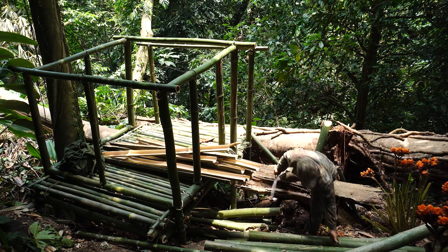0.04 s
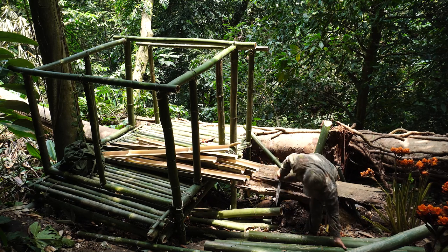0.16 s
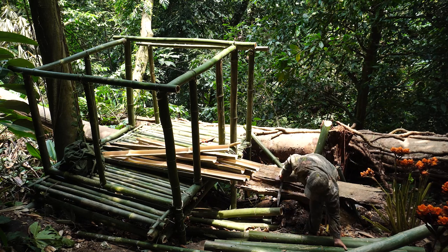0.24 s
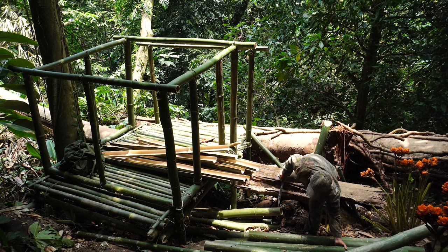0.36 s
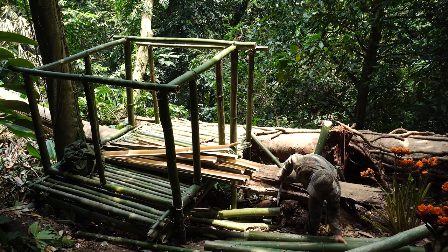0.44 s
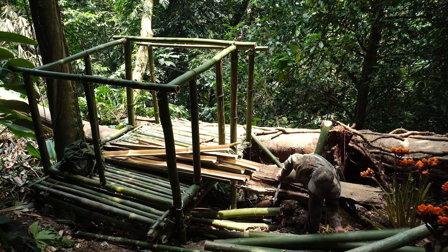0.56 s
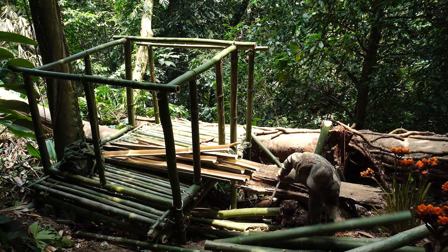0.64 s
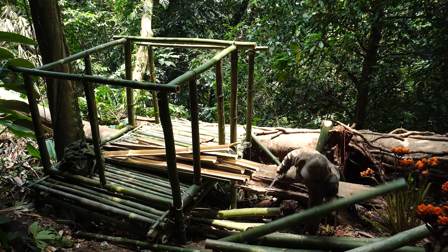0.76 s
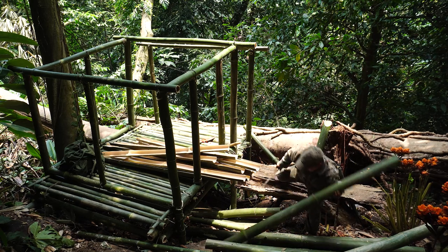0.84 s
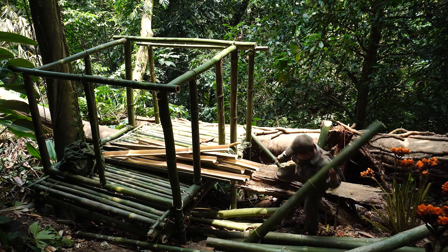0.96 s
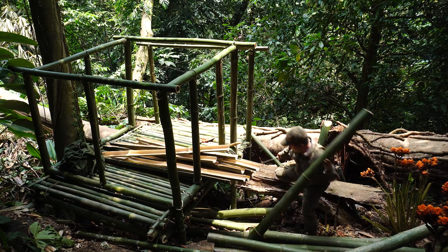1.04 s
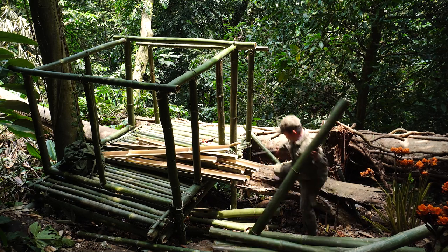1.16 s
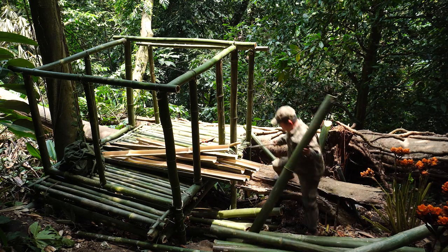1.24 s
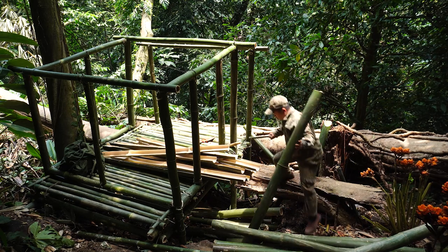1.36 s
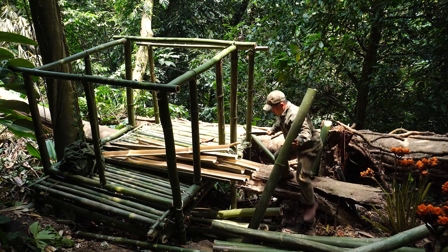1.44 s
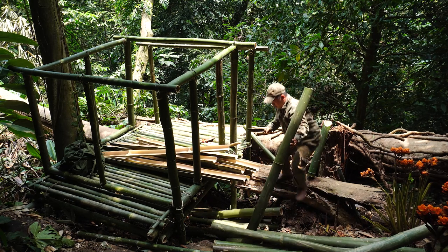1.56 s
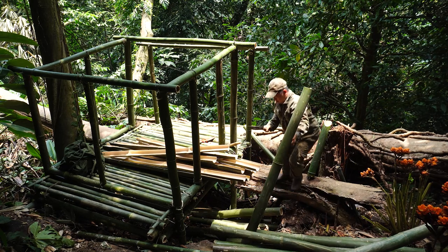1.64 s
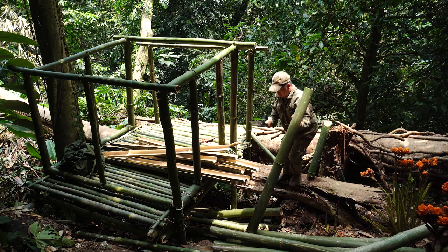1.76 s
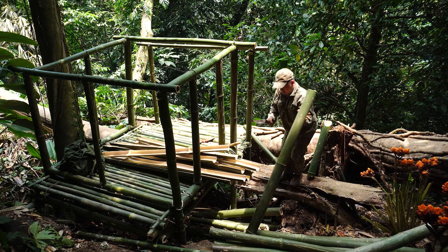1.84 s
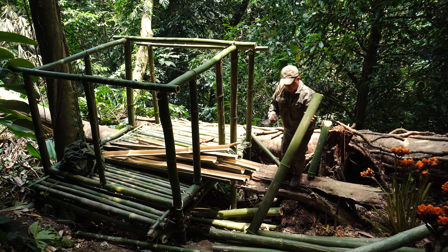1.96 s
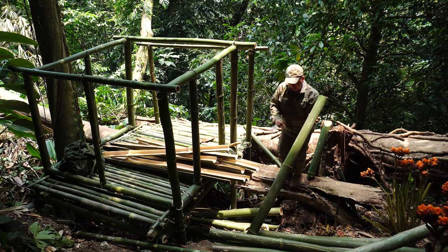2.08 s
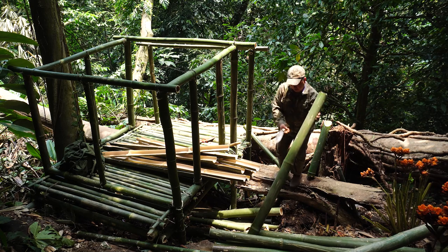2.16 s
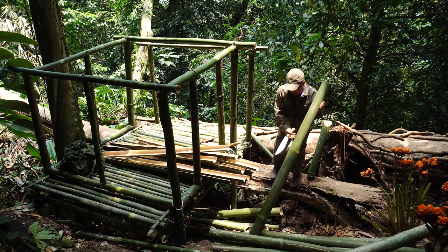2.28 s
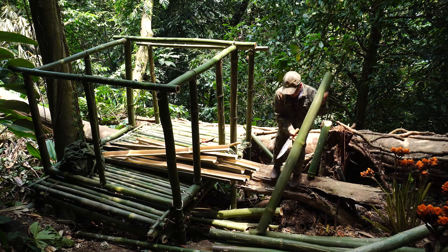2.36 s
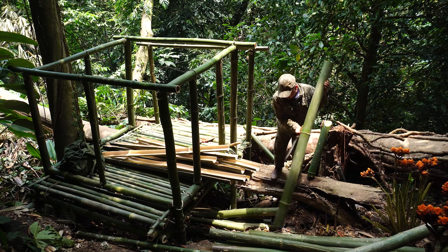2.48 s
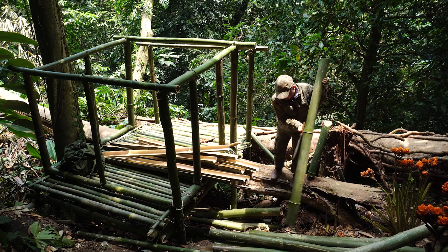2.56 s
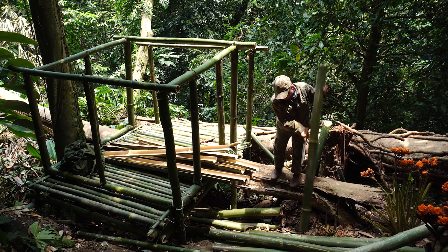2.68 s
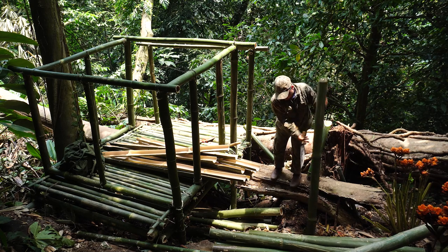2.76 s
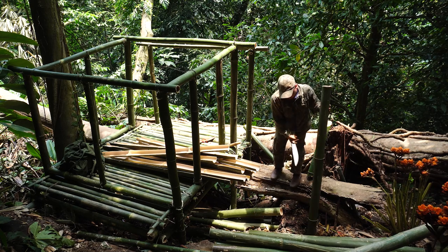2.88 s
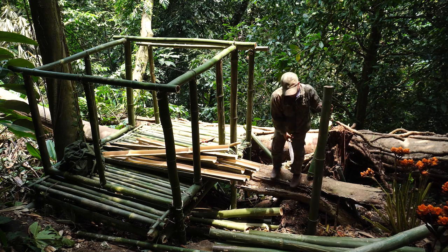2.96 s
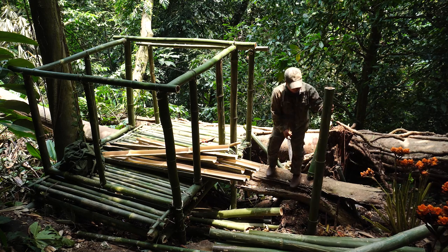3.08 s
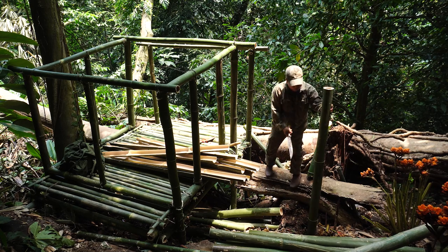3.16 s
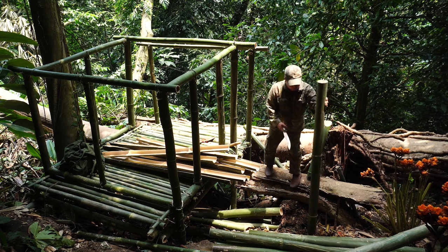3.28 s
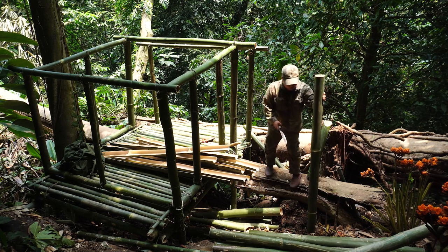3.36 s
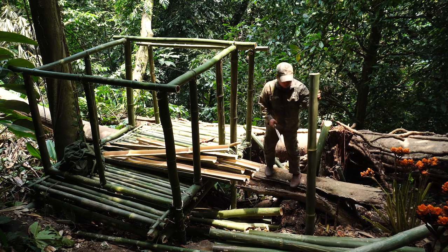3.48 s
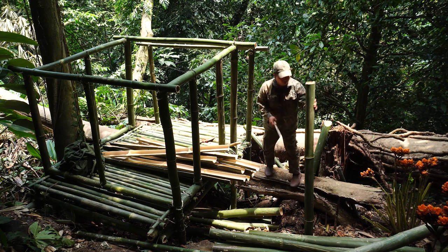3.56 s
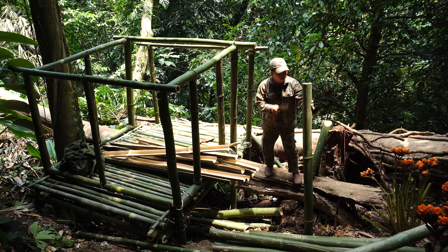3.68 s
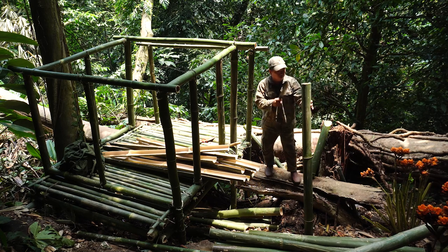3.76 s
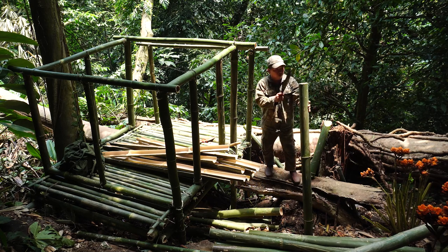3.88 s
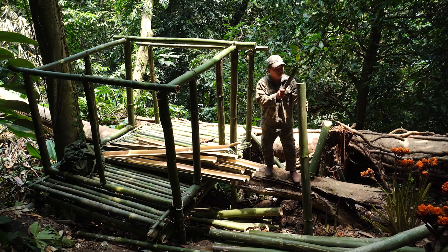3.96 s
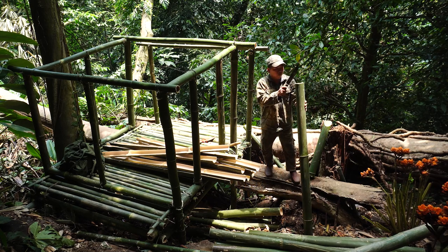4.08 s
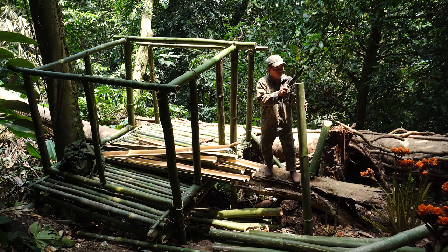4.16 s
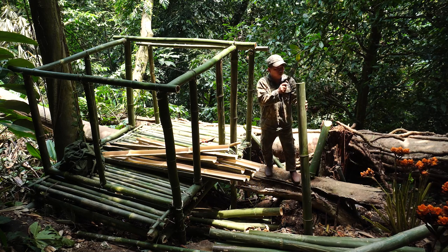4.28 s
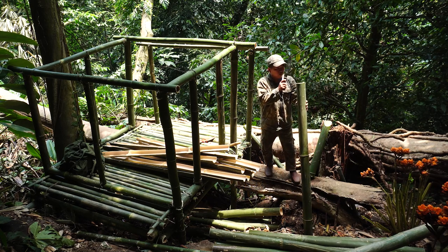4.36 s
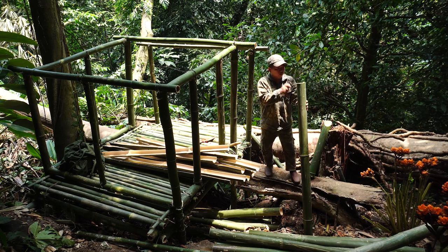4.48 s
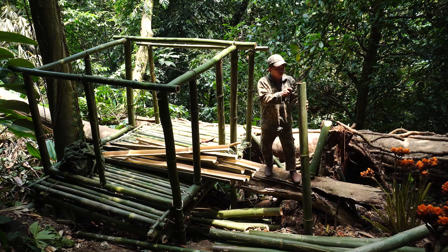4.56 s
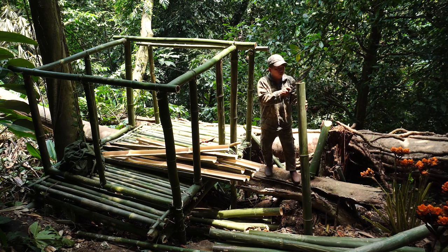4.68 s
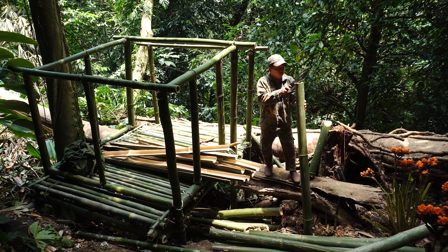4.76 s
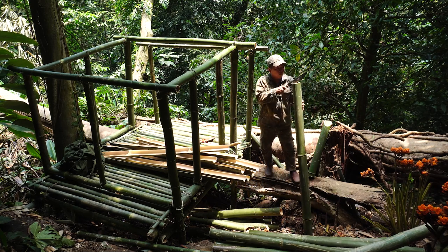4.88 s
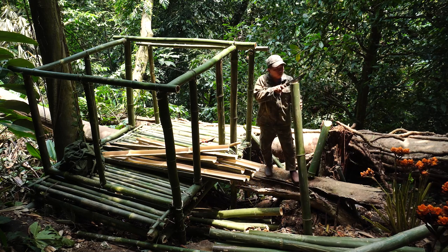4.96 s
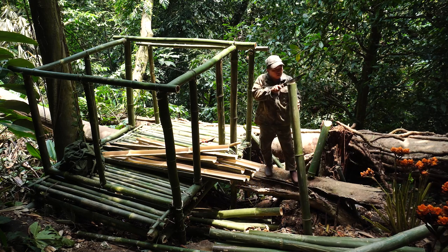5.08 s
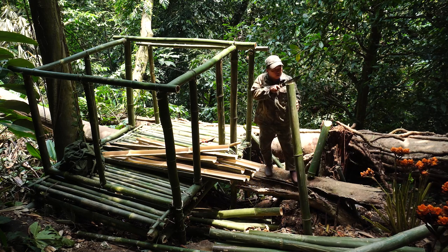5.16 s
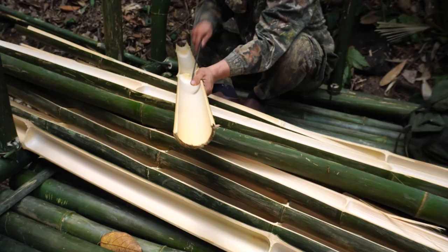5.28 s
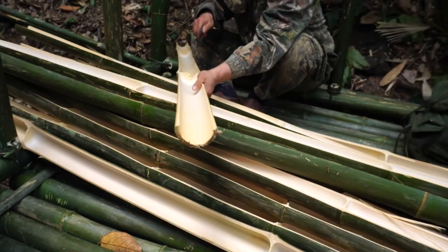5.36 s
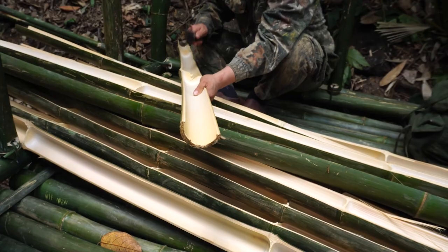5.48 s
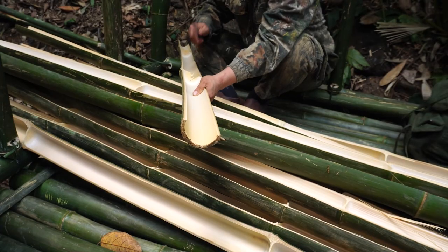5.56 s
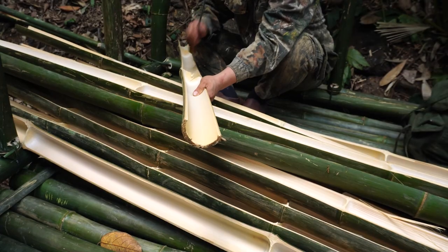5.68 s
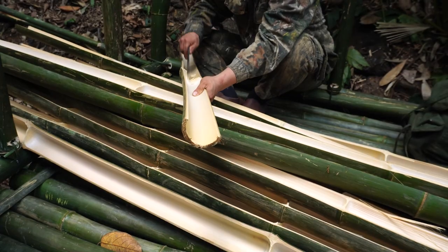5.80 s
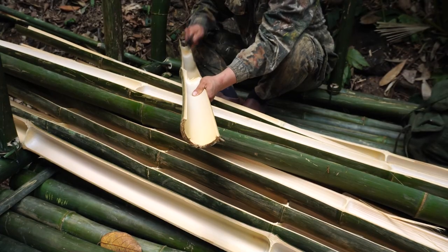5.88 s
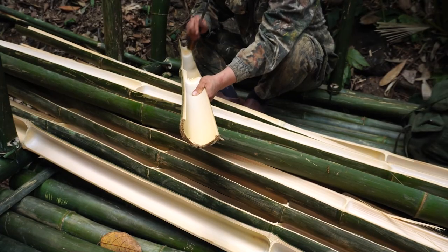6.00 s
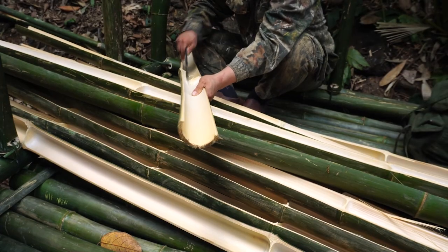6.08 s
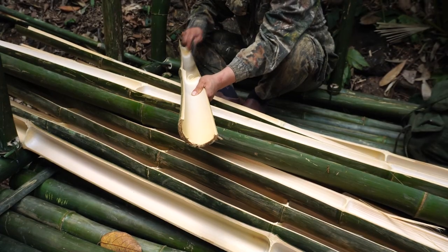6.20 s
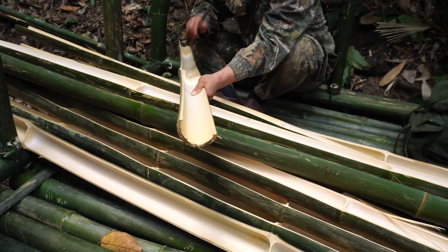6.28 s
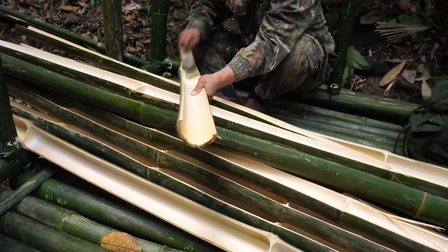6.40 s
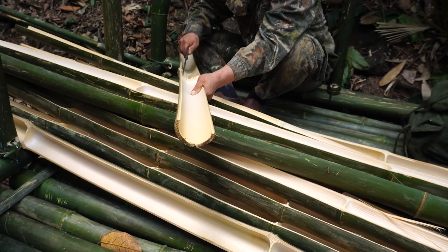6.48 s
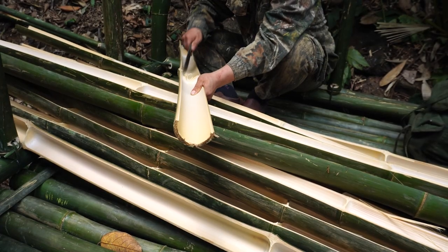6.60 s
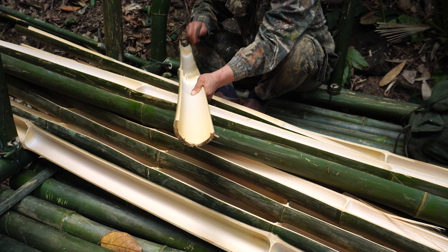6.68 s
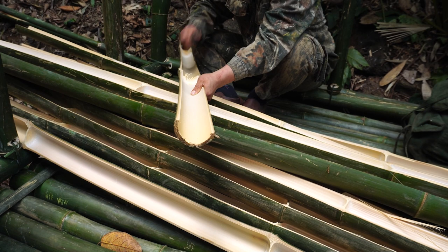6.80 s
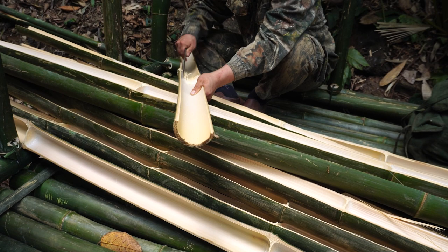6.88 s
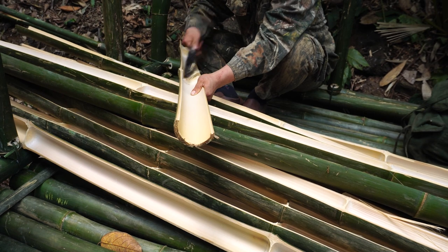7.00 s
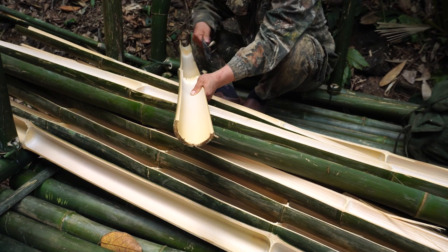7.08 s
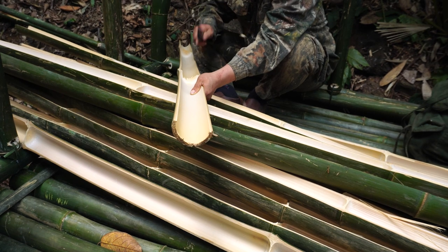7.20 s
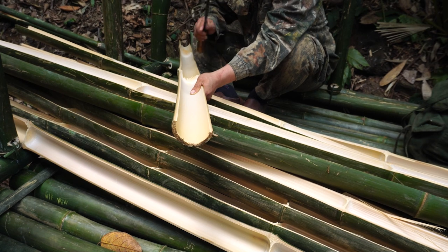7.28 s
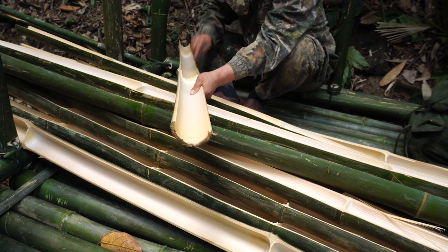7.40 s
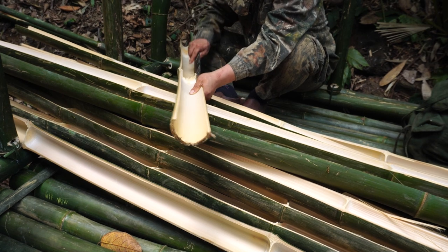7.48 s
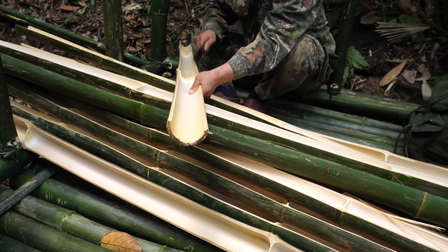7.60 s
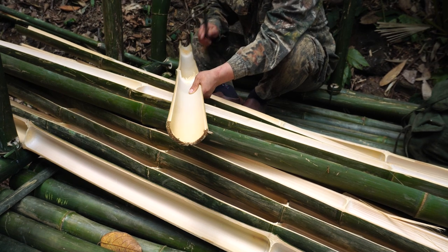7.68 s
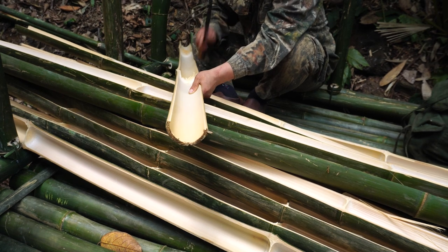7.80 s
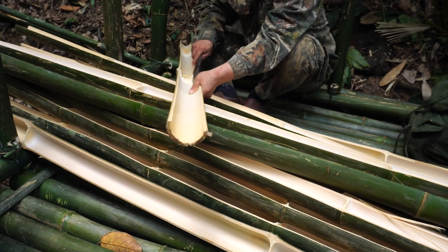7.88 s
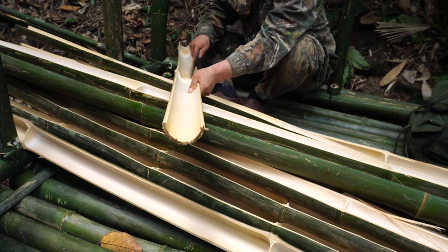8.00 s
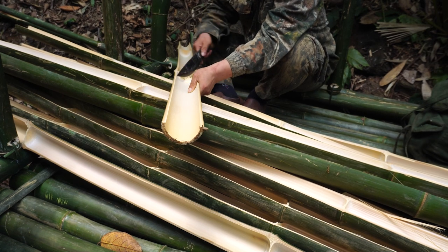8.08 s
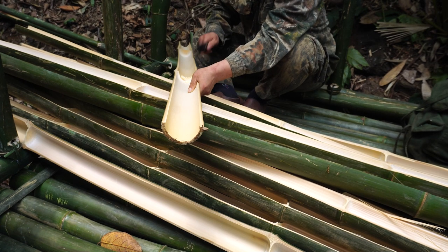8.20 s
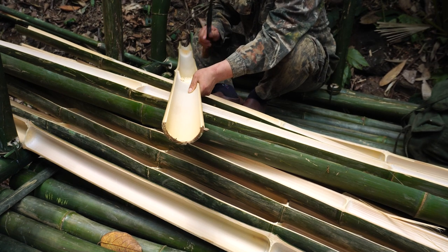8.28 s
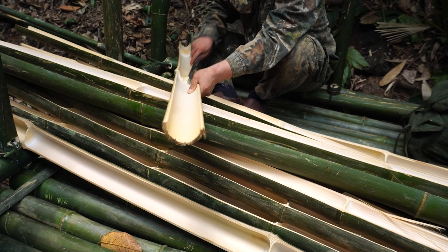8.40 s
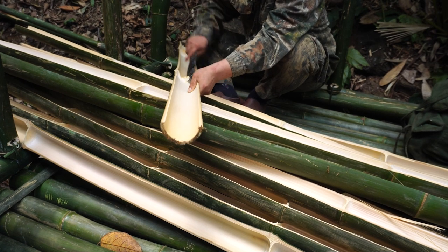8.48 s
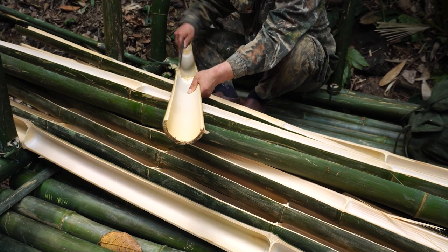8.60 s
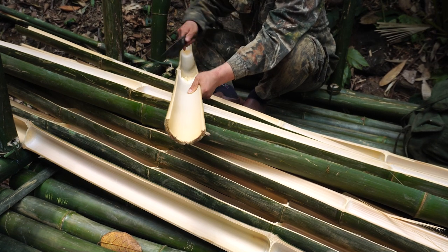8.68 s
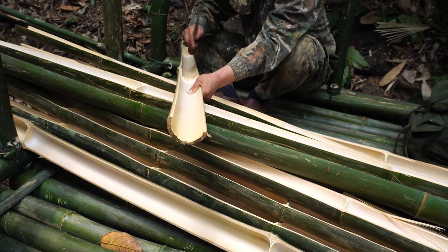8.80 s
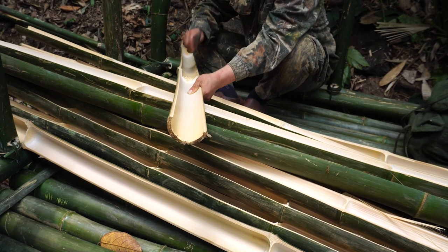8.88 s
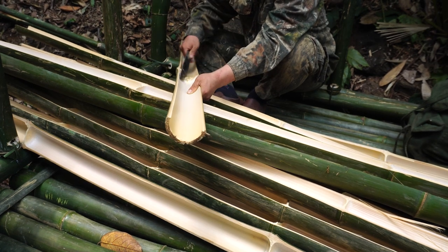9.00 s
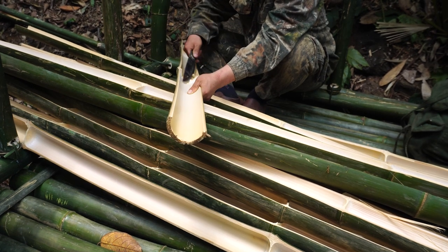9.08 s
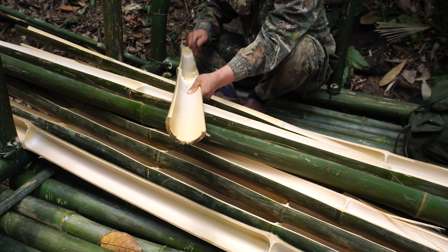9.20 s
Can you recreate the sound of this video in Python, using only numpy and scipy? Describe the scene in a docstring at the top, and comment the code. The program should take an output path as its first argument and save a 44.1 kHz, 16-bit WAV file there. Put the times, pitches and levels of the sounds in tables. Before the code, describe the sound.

Stereo outdoor sound, first from some metres off, then near the work. Bamboo rattles and tumbles early on with tree echoes, goes nearly quiet, and takes a hard knife hit and a weaker one. Then come close, drier chops on split bamboo, roughly two per second at first, slower and less regular later, with light rattling rebounds. High buzzing insect chirps, a thin whine before the cut, and soft leaf hiss surround it.

```python
"""In a forest, bamboo is worked. Some metres off, a long pole clatters on its neighbours and is struck with a knife;
then, close by, a split piece is set down, chopped with the knife and bounces on a pile of slats. Each blow sums
ringing modes, a noisy rattle and a crack of random snaps, with echoes from the trees; scrapes and grainy noise
are many tiny slips. Behind run rasping upward sweeps (chirps), a fluttering insect tone, one hoarse arched
bird call (a tone times noise) and the hush of air and leaves (banded noise)."""
import sys
import numpy as np
from scipy import signal
from scipy.fft import rfft
from scipy.io import wavfile

SR = 44100
rng = np.random.default_rng(int(sys.argv[2]) if len(sys.argv) > 2 else 0)


def store_wav(level_fs):
    """Save 16-bit WAV to argv[1]."""
    pcm = np.round(np.clip(np.atleast_2d(level_fs), -1, 1) * 32767)
    wavfile.write(sys.argv[1], SR, pcm.T.astype(np.int16))


N = 407925
TIME = np.arange(N) / SR
AGE = TIME[:SR // 3]   # time since a blow or the start of a chirp [s]
STOP_S = 5.34   # pole and whine stop abruptly here

# ringing modes of the split piece, before the hand damps them:
# (frequency [Hz], relative level [dB], t60 [s])
PIECE_MODES = [(133, -29.5, 0.28), (347, -27, 0.055), (472.7, -14.5, 0.41), (555.5, -7.5, 0.32),
               (588.1, -3, 0.138), (725.3, -8.5, 0.047), (837.7, -8, 0.0857), (827, -33.5, 0.18),
               (920.1, -12.5, 0.155), (1086.1, -9.5, 0.224), (1211.3, -12, 0.115), (1417.3, -5, 0.074),
               (1543, -10, 0.091), (1753, -11.5, 0.038), (2111.4, 1.5, 0.0385), (2184.7, 4.5, 0.0488),
               (2733.6, -5.5, 0.059), (3181, 2, 0.0289), (3786, -6.5, 0.067), (4300, -27.5, 0.027),
               (5150, -42.5, 0.037), (6270, -31.5, 0.134)]


def from_db(db):
    """Decibels to gain."""
    return 10 ** (np.asarray(db) / 20)


def rms(x):
    """Root mean square."""
    return np.sqrt(np.mean(x ** 2) + 1e-20)


def in_time(rows):
    """Each column of a curve, interpolated at every sample."""
    s, *columns = np.transpose(rows)
    return [np.interp(TIME, s, c) for c in columns]


def add(out, s, sound):
    """Mix a stereo sound in at time s."""
    at = max(round(s * SR), 0)
    out[:, at:at + sound.shape[1]] += sound[:, :N - at]


def butter(x, hz, kind, order=2):
    """Causal Butterworth filter."""
    sos = signal.butter(order, np.minimum(hz, .45 * SR), kind, fs=SR, output="sos")
    return signal.sosfilt(sos, x)


def drift(rate):
    """A random wander about zero through `rate` normal draws a second."""
    knots = rng.standard_normal(4000)
    return np.interp(TIME * rate, np.arange(len(knots)), knots)


def widen(pair, side_db):
    """Two unrelated signals as mid and side; returns left and right."""
    side = from_db(side_db) * pair[1] * np.array([[1], [-1]])
    return (pair[0] + side) / np.sqrt(1 + from_db(side_db) ** 2)


def banded_noise(table, size, side_db, count=1):
    """Stereo noises built of half-octave bands; with a t60 column, each band dies at its own rate."""
    hz, level, *t60 = np.transpose(table)
    edges = 25 * 2 ** np.arange(0, 9.6, .5)
    # neighbouring bands draw on different noise
    white = rng.standard_normal((2, 2, count, 1, size))
    out = np.zeros((count, 2, size))
    for k, (low, high) in enumerate(zip(edges, edges[1:])):
        centre = np.sqrt(low * high)
        if hz[0] / 1.2 < centre < hz[-1] * 1.2:
            fade_db = 0
            if t60:
                fade_db = -60 * TIME[:size] / np.interp(np.log(centre), np.log(hz), t60[0])
            gain = from_db(np.interp(np.log(centre), np.log(hz), level) + fade_db)
            # long waves reach both microphones alike
            band_side_db = side_db - 10 * np.log10(1 + (300 / centre) ** 2)
            out += butter(widen(white[k % 2], band_side_db) * gain, [low, high], "band")
    return out


def hush():
    """Soft forest air, noise strongest around 500 to 900 Hz, with the stirring hiss of leaves on top."""
    # slow swell: (time [s], relative level of air [dB], relative level of leaves [dB])
    swell = [(0, -57.5, -70), (2.4, -56, -69), (3.2, -57, -70.5), (5.7, -57.5, -69.5), (9.25, -56.5, -69.5)]
    # colour of the air: (frequency [Hz], relative density [dB per Hz])
    air_colour = [(30, -47.5), (60, -59), (110, -22), (170, -23.5), (260, -10), (480, -3), (900, -4),
                  (1800, -7.5), (3000, -7.5), (3800, -15)]
    # colour of the leaf hiss: (frequency [Hz], relative density [dB per Hz])
    leaf_colour = [(2000, -4.5), (3500, 8), (5500, 2), (8000, 1), (12000, -5.5), (16000, -5.5)]
    air_db, leaf_db = in_time(swell)
    air = banded_noise(air_colour, N, side_db=1.5)[0]
    leaves = banded_noise(leaf_colour, N, side_db=-2.0)[0]
    stir_db = .8 * drift(20)
    air_layer = from_db(air_db + 2.3051) * air / rms(air)
    return air_layer + from_db(leaf_db + 8.0 + stir_db) * leaves / rms(leaves)


def chirp_times():
    """Time and level of every chirp: lost time slows the start of a run, which settles to an even pace."""
    # (start [s], end [s], settled spacing [s], time lost getting up to speed [s], starting level [dB])
    runs = [(0.018, 1.1, 0.1912, 0.0, -46.5), (1.527, 3.8, 0.1747, 0.0899, -45.5),
            (3.927, 5.47, .176, .035, -45), (7.12, 9.2, 0.1755, 0.071, -47.5)]
    settle_chirps, swell_db_per_s = 2.1, 0.5
    for start, end, spacing, lost, db in runs:
        k = np.arange(20)
        times = start + spacing * k + lost * (1 - np.exp(-k / settle_chirps))
        levels = db + swell_db_per_s * (times - start) + 0.93 * rng.standard_normal(len(k))
        yield from zip(times[times < end], levels)


def from_afar(call, t60, direct_db):
    """A call from deep in the trees: decaying noise scatters it, with a little of the direct ray."""
    scatter = widen(rng.standard_normal((2, SR)), side_db=-1.5) * from_db(-60 * TIME[:SR] / t60)
    scatter /= rms(scatter) * np.sqrt(SR)   # unit energy
    return from_db(direct_db) * call + signal.fftconvolve(call, scatter, axes=1)[:, :N]


def chirps(start_hz=4100, end_hz=4720, length_s=.075, rasp_hz=120, second_db=-4):
    """Rasping upward sweeps, each followed by a weaker one, smeared by the trees into a buzzing band."""
    out = np.zeros((2, N))
    progress = np.minimum(AGE / length_s, 1)
    arch = (4 * progress * (1 - progress)) ** 0.473
    ear_db = np.array([[0.0], [1.8]])   # a little stronger on the right
    for s, db in chirp_times():
        for delay_s, stroke_db in [(0, 0), (rng.uniform(.05, .09), second_db)]:
            rasp = butter(rng.standard_normal(len(AGE)), 275.7, "low")
            hz = start_hz + (end_hz - start_hz) * progress + rasp_hz * rasp / rms(rasp)
            sweep = arch * np.sin(2 * np.pi * np.cumsum(hz) / SR)
            add(out, s + delay_s, from_db(db + stroke_db + ear_db) * sweep)
    return butter(from_afar(out, t60=1.0, direct_db=-5.5), [4020, 4760], "band", order=5)


def whine(waver_db=1.5, upper_hz=2780, upper_db=-68, fade_s=0.049):
    """A thin fluttering insect tone in short phrases, with a fainter one that comes and goes above it."""
    # slow rise of the tone: (time [s], frequency [Hz])
    pitch = [(0, 2400), (1.5, 2472), (2.5, 2503), (4, 2518), (5.3, 2545)]
    # phrases, before flutter and stereo balance: (start [s], end [s], level [dB])
    phrase_rows = [(0.1, 0.85, -67.5), (0.902, 1.846, -56), (1.933, 2.625, -56), (2.704, 3.122, -57.5),
                   (3.271, 3.445, -55), (3.514, 3.901, -57.5), (3.946, 4.282, -57), (4.299, 4.802, -55.5),
                   (4.85, 4.981, -56.5), (5.049, 5.313, -56.5)]
    hz, = in_time(pitch)
    phrases = np.zeros(N)
    for start, end, db in phrase_rows:
        phrases += from_db(db) * np.clip(np.minimum(TIME - start, end - TIME) / fade_s, 0, 1)
    flutter = 1 + .35 * drift(80)
    tone = np.sin(2 * np.pi * np.cumsum(hz + 9 * drift(70)) / SR)
    main = phrases * from_db(waver_db * drift(10)) * flutter * tone
    upper = from_db(upper_db + 3 * drift(4)) * drift(60) * np.sin(2 * np.pi * upper_hz * TIME)
    before_stop = np.clip((STOP_S - TIME) / .01, 0, 1)
    return (main + upper) * before_stop * from_db([[-1.5], [1.8]])


def forest(x, build_s):
    """Echoes from the trees: noise that builds up over about build_s and dies away band by band."""
    # scatter from trunks and leaves: (frequency [Hz], relative level [dB], t60 [s])
    scatter_bands = [(50, -17, 0.36), (90.8, 9, 0.446), (140.5, 8.5, 0.82), (275.5, 7, 0.385),
                     (576, -6, 0.299), (1530, -5, 0.472), (3010, -6, 0.455), (6040, -3.5, 0.456),
                     (15000, -1.5, 0.371)]
    echo = banded_noise(scatter_bands, SR, side_db=-5.0)[0] * (1 - np.exp(-(TIME[:SR] / build_s) ** 2))
    echo /= rms(np.abs(rfft(echo))[:, 400:2500])   # unit mean gain from 400 to 2500 Hz
    return signal.fftconvolve(x, echo, axes=1)[:, :N]


def blow(modes, rattle, bands_db, split_s, rattle_db, side_db):
    """One contact: fibres crack for some ms, modes ring, neighbours rattle; each register has its strength."""
    hz, level, t60 = np.transpose(modes)[:, :, None]
    # grip and point of contact shift and weight the modes anew at every blow
    hz = hz * rng.normal(1, .008, hz.shape)
    strength = from_db(level + rng.normal(0, 2.5, hz.shape) - 60 * AGE / t60)
    # each mode radiates its own pattern, so it meets the two microphones at different phases
    phase = rng.uniform(0, 2 * np.pi, hz.shape)
    skew = np.arctan(from_db(side_db) * hz / np.hypot(hz, 300)) * rng.choice([-1, 1], hz.shape)
    ring = np.array([(strength * np.sin(2 * np.pi * hz * AGE + phase + ear * skew)).sum(axis=0)
                     for ear in (1, -1)])
    ring *= 1 - np.exp(-AGE / 0.000765)

    # about 6000 fibre snaps a second, swelling and fading with the splitting time
    snaps = (rng.random((2, len(AGE))) < 6000 / SR) * rng.standard_normal((2, len(AGE)))
    crack = butter(widen(snaps, side_db=-6), [1500, 8500], "band", order=1)
    crack = crack * AGE / split_s * np.exp(-(AGE / split_s) ** 1.07)

    attack = AGE < .02   # levels are set over the first 20 ms
    parts = [(ring, 0), (rattle, rattle_db), (crack, -9)]
    sound = sum(from_db(db) * part / rms(part[:, attack]) for part, db in parts)
    sound = sound * (1 - from_db(-10) * np.exp(-AGE / 0.0132))   # the force builds as the contact deepens
    registers = [butter(sound, 700, "low", order=4),   # thud
                 butter(sound, [700, 1800], "band", order=3),   # body
                 butter(sound, [1800, 5000], "band", order=3),   # clack
                 butter(sound, 5000, "high", order=4)]   # crack
    return sum(from_db(db) * part / rms(part[:, attack]) for part, db in zip(registers, bands_db))


def blows(contacts, modes, clack_db, rattle_db, side_db, ring_t60, grip_db_per_s, echo_db, build_s):
    """Blows on one piece, damped by the hand; a hard contact is brighter, a clean ring leaves less rattle."""
    # dense rattle of bamboo on bamboo, before the hand damps it:
    # (frequency [Hz], relative density [dB per Hz], t60 [s])
    rattle_bands = [(40, -62.5, 0.035), (114.8, -18, 0.3), (203.6, -11, 0.14), (436.2, 7.5, 0.2015),
                    (921, -6.5, 0.291), (2465, 3.5, 0.0995), (4790, -5.5, 0.0416), (7850, -24, 0.14),
                    (15500, -41.5, 0.012)]
    clack_share = 0.43   # a harder contact lifts the clack by this share of what it adds to the crack
    direct = np.zeros((2, N))
    rattles = banded_noise(rattle_bands, len(AGE), side_db, count=len(contacts))
    for (s, db, thud, crack, ring_hz, ring_db, split_s), rattle in zip(contacts, rattles):
        bands_db = db + np.array([thud, 0, clack_db + clack_share * crack, crack])
        all_modes = modes + [(ring_hz, ring_db, ring_t60)]
        sound = blow(all_modes, rattle, bands_db, split_s, rattle_db - ring_db, side_db)
        add(direct, s, sound * from_db(-grip_db_per_s * AGE))
    return direct + from_db(echo_db) * forest(direct, build_s)


def pole(ring_db=6.0, knock_split_s=0.0107, cut_split_s=0.00377):
    """The long pole, some metres off, is handled and then struck; it falls silent abruptly at STOP_S."""
    # knocks on neighbours and ground; level is that of the body register, thud and crack relative to it:
    # (time [s], level [dB], thud [dB], crack [dB], main ring [Hz])
    knock_rows = [(0.456, -53, 7.5, -18, 499.4), (0.518, -46.5, 0.5, -31.5, 518),
                  (0.883, -43.5, -9.5, -5.5, 503.4), (1.066, -26.5, -8.5, -20, 461.2),
                  (1.082, -31, -2.5, -29.5, 622), (1.15, -31.5, -0.5, -25.5, 634),
                  (1.182, -35.5, -10.5, -23.5, 854), (1.301, -44.5, 3.5, -16, 474.7),
                  (1.363, -40, 5, -27, 486.8), (1.448, -34.5, -9.5, -29.5, 893.7),
                  (1.76, -60.5, -12.5, 7.5, 827), (1.908, -47.5, -8, -36.5, 770.7),
                  (2.432, -57, 1, -4.5, 477), (2.639, -61, 8.5, -19.5, 504), (2.891, -40.5, -13, -6, 816.8),
                  (3.661, -64.5, -5.5, 0.5, 837)]
    # the knife strikes the upright pole, same levels:
    # (time [s], level [dB], thud [dB], crack [dB], main ring [Hz], relative ring level [dB])
    cut_rows = [(4.601, -20.5, -27.5, -14, 1010, 1.5), (5.277, -35, -8, -19.5, 818, 11.5)]
    # ringing modes, before the hand damps them: (frequency [Hz], relative level [dB], t60 [s])
    pole_modes = [(334.45, -7, 0.149), (591.9, -4, 0.116), (791.2, -10.5, 0.148), (969.6, -5.5, 0.125),
                  (1211, 2, 0.0405), (1509.4, 0.5, 0.0374), (1712, -15.5, 0.138), (2124, -7, 0.059),
                  (2271, -11, 0.029), (2574, -11, 0.253), (2719, -11.5, 0.106), (4095, -17, 0.066),
                  (4755, -31, 0.052)]
    knocks = blows([(*row, ring_db, knock_split_s) for row in knock_rows], pole_modes,
                   clack_db=6.5, rattle_db=5.0, side_db=-6.5,
                   ring_t60=0.1043, grip_db_per_s=110.5, echo_db=-5.5, build_s=0.0077)
    cuts = blows([(*row, cut_split_s) for row in cut_rows], pole_modes,
                 clack_db=6, rattle_db=1.0, side_db=-6,
                 ring_t60=0.119, grip_db_per_s=111.5, echo_db=-5.5, build_s=0.0117)
    return (knocks + cuts) * np.clip((STOP_S - TIME) / 0.0057, 0, 1)


def scrapes():
    """Dry scrapes, and grainy noise that thickens the clatter and some blows: tiny slips that swell and fade."""
    # (middle [s], half length [s], level [dB], centre frequency [Hz])
    grains = [(1.048, 0.0426, -44.5, 4140), (1.108, 0.058, -37.5, 568), (1.251, 0.274, -61.5, 5600),
              (1.329, 0.147, -43, 422), (2.328, 0.1, -58, 4170), (5.463, 0.105, -52, 878),
              (7.865, 0.075, -56.5, 2140), (8.116, 0.0207, -39, 1510), (8.88, 0.0404, -44, 1495)]
    out = np.zeros((2, N))
    for s, half_s, db, hz in grains:
        slips = (rng.random((2, SR)) < 1500 / SR) * rng.standard_normal((2, SR))
        grit = butter(widen(slips, side_db=-4.5), [hz / 1.92, hz * 1.613], "band")
        swell = np.exp(-((TIME[:SR] - .5) / half_s) ** 2)
        add(out, s - .5, from_db(db) * grit / rms(grit) * swell)
    return out


def bounces(thud_db=-12, ring_db=-0.5, split_s=0.00262):
    """The piece is set down, then between chops bounces and snaps as the blade is freed: lighter, drier."""
    # level is that of the body register, crack relative to it:
    # (time [s], level [dB], crack [dB], main ring [Hz])
    bounce_rows = [(5.405, -39.5, -22, 647), (5.91, -32, -51.5, 1113), (6.653, -44, -7.5, 1196),
                   (6.865, -52, -17.5, 1270), (7.068, -45, -7.5, 1455), (7.304, -51.5, -16.5, 1297),
                   (7.584, -34, -32.5, 589.6), (7.619, -53.5, 4.5, 1140), (8.082, -46.5, -4, 1168),
                   (8.127, -24.5, -8, 541.7), (8.154, -29.5, -9.5, 530), (8.674, -23, -26.5, 593.5),
                   (9.088, -37, -11, 740), (9.117, -42.5, -2, 545.2)]
    contacts = [(s, db, thud_db, crack, hz, ring_db, split_s) for s, db, crack, hz in bounce_rows]
    return blows(contacts, PIECE_MODES, clack_db=4, rattle_db=0.0, side_db=-4,
                 ring_t60=0.0915, grip_db_per_s=81.5, echo_db=-17.5, build_s=0.011)


def chops(thud_db=-13, ring_db=-2.0):
    """The knife bites into the split piece, close by; fibres split and the piece rings."""
    # level is that of the body register, crack relative to it:
    # (time [s], level [dB], crack [dB], main ring [Hz], splitting time [s])
    chop_rows = [(5.815, -21, -8, 1192, 0.00525), (6.161, -18.5, -15.5, 1103, 0.0065),
                 (6.504, -20.5, -11.5, 1183, 0.0044), (6.921, -18, -14, 1170, 0.0036),
                 (7.505, -17.5, -19, 1212, 0.0033), (7.931, -17.5, -17.5, 1165, 0.00443),
                 (8.478, -16.5, -21.5, 1451, 0.00623), (9.023, -20.5, -18, 1500, 0.00375)]
    contacts = [(s, db, thud_db, crack, hz, ring_db, split_s) for s, db, crack, hz, split_s in chop_rows]
    return blows(contacts, PIECE_MODES, clack_db=4.0, rattle_db=-1.5, side_db=-4,
                 ring_t60=0.1, grip_db_per_s=70.5, echo_db=-12, build_s=0.0126)


def bird(hoarse_hz=420):
    """One hoarse, airy call that arches up and down: a gliding tone times low noise, from deep in the trees."""
    # the call before the trees scatter it: (time [s], frequency [Hz], level [dB])
    glide = [(6.19, 5516, -66.5), (6.23, 6210, -43.5), (6.27, 6730, -51), (6.33, 6740, -58),
             (6.39, 6560, -56), (6.44, 5617, -49), (6.48, 5390, -41), (6.5, 5600, -60.5)]
    hz, db = in_time(glide)
    sounding = (TIME > glide[0][0]) & (TIME < glide[-1][0])
    hoarseness = butter(rng.standard_normal(N), hoarse_hz, "low")
    tone = np.sin(2 * np.pi * np.cumsum(hz) / SR)
    call = sounding * from_db(db) * hoarseness / rms(hoarseness) * tone
    return from_afar(np.array([call, call]), t60=.3, direct_db=-4)


def scene():
    """The work in front, the forest behind."""
    work = pole() + scrapes() + bounces() + chops()
    return work + hush() + chirps() + whine() + bird()


def record(dry, ceiling=1.0, cutoff_hz=16200):
    """The deep bass is thinned, the highest peaks are rounded and the top is cut."""
    rounded = ceiling * np.tanh(butter(dry, 45, "high", order=1) / ceiling)
    top_cut = signal.ellip(10, .1, 70, cutoff_hz, fs=SR, output="sos")
    return signal.sosfilt(top_cut, rounded)


dry = scene()
out = record(dry)
store_wav(out)
```